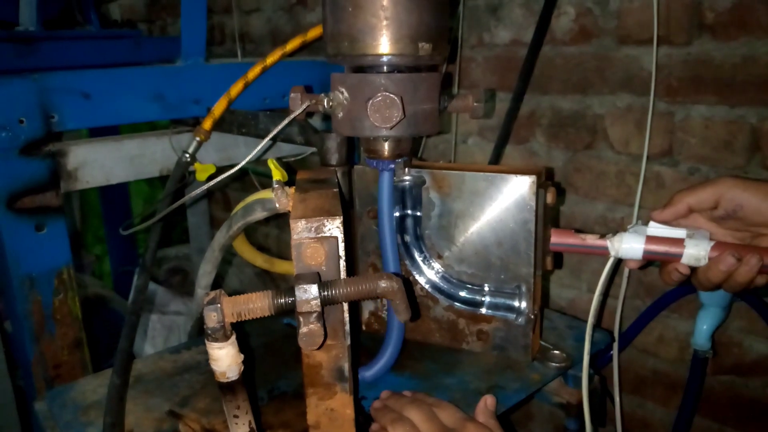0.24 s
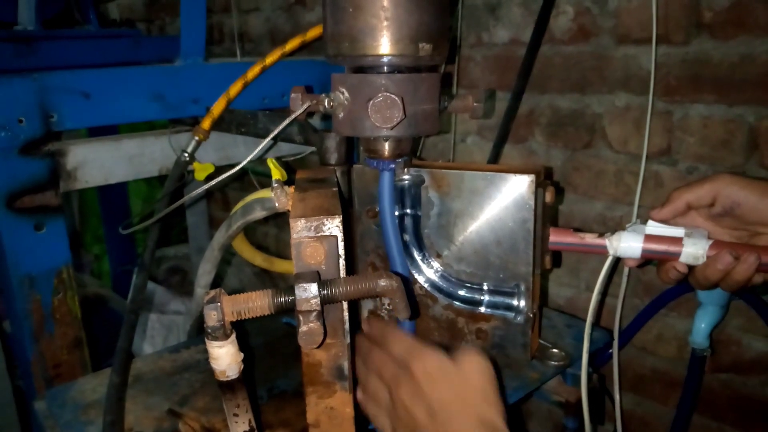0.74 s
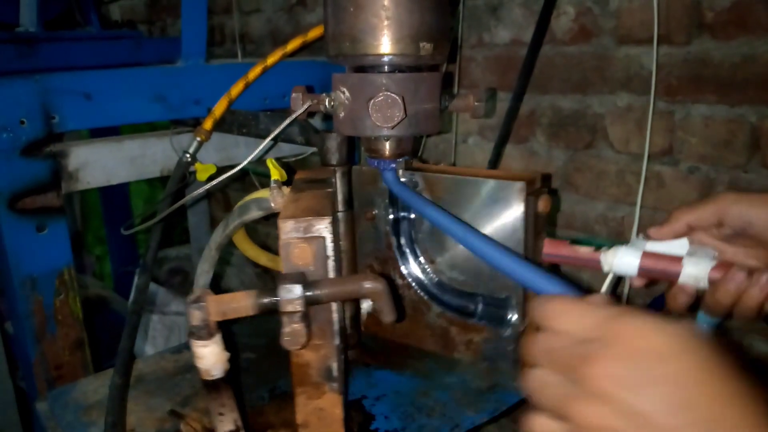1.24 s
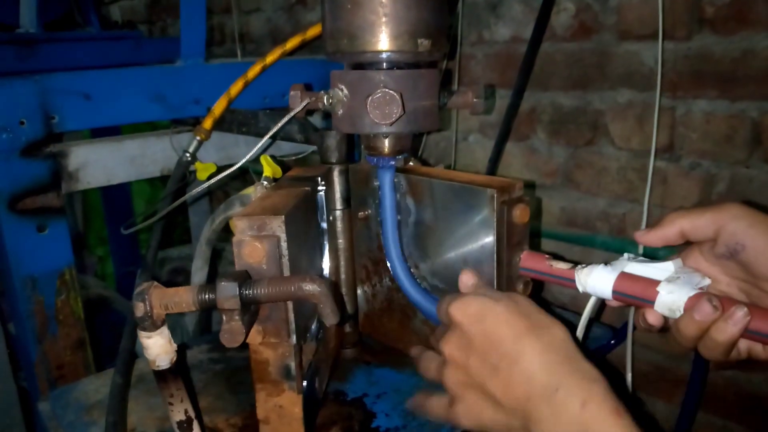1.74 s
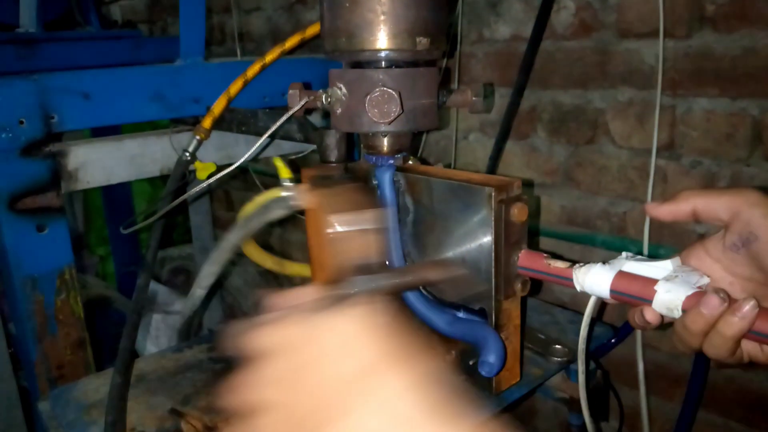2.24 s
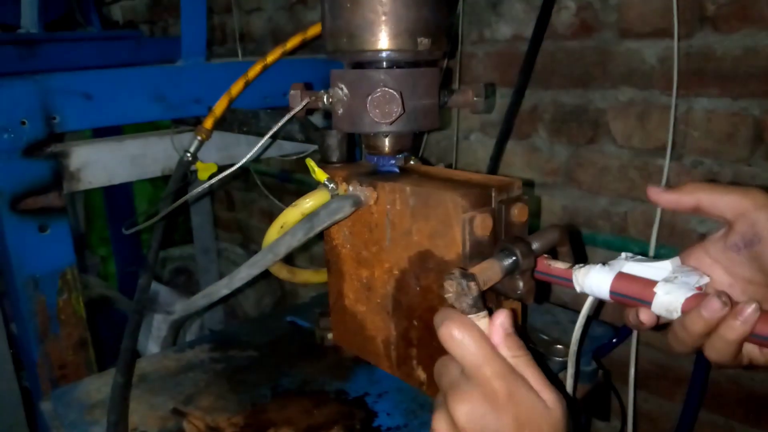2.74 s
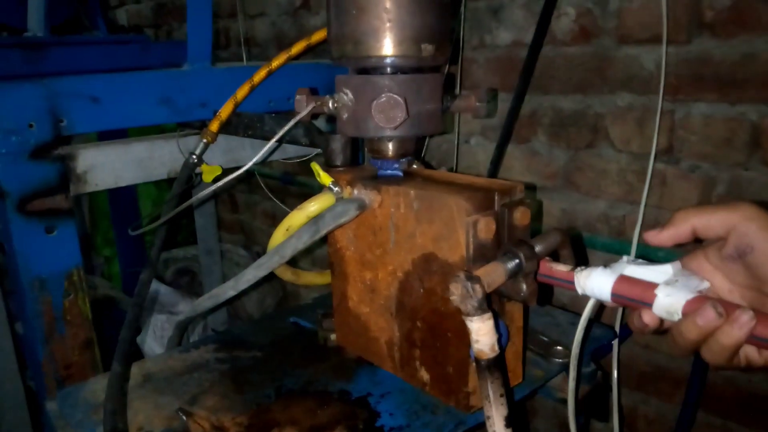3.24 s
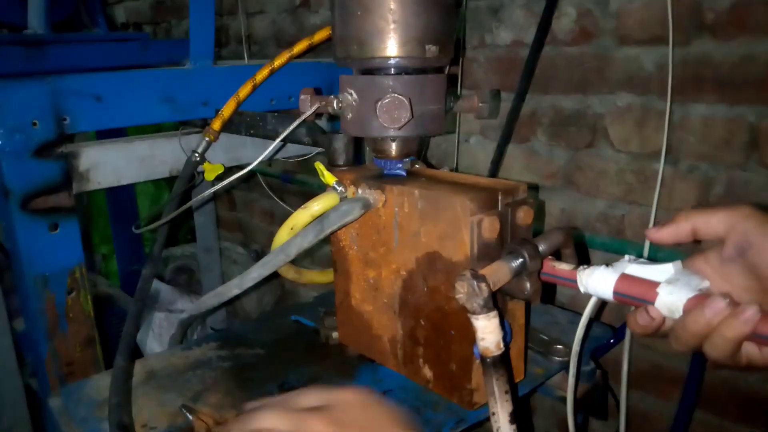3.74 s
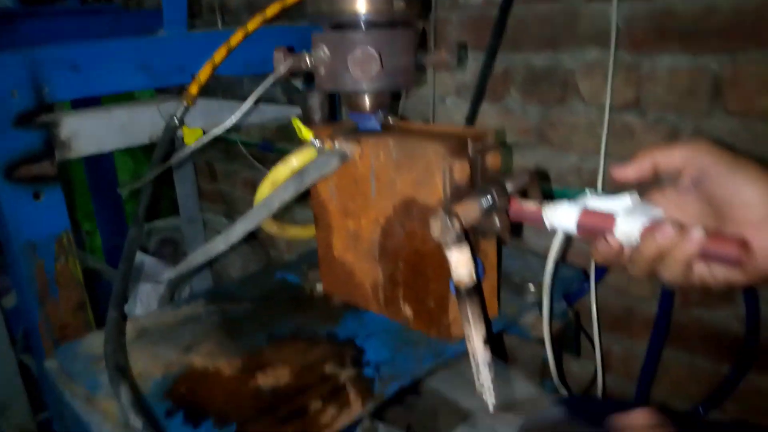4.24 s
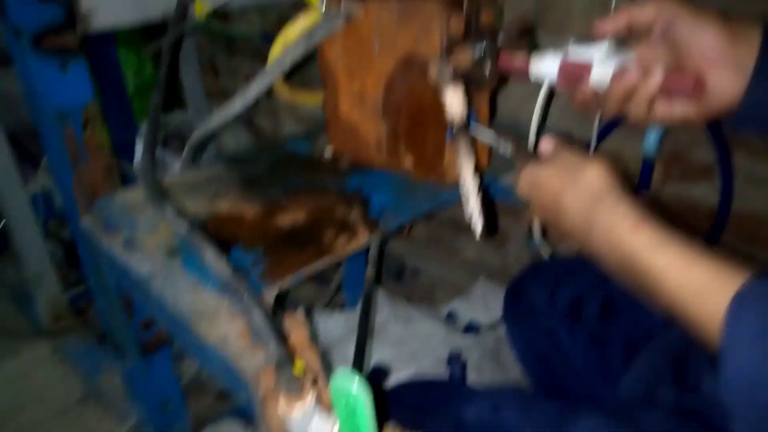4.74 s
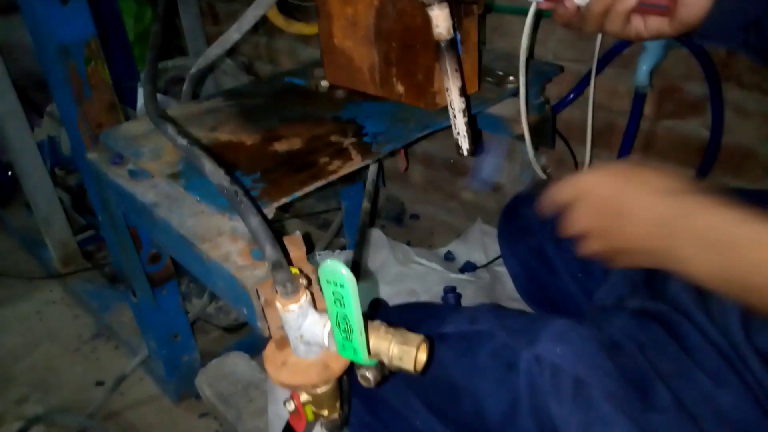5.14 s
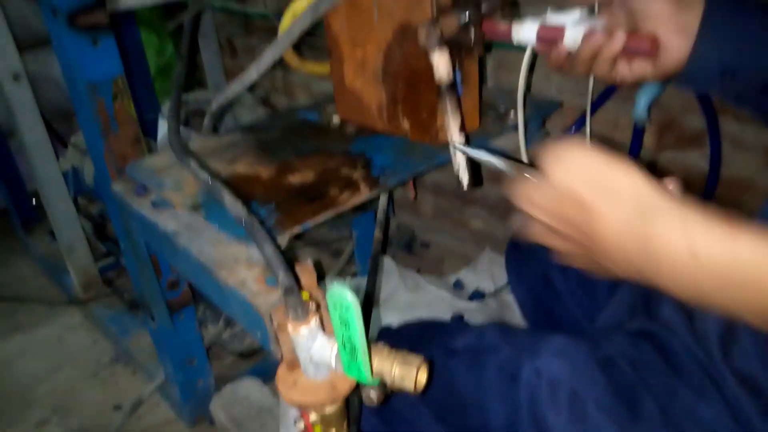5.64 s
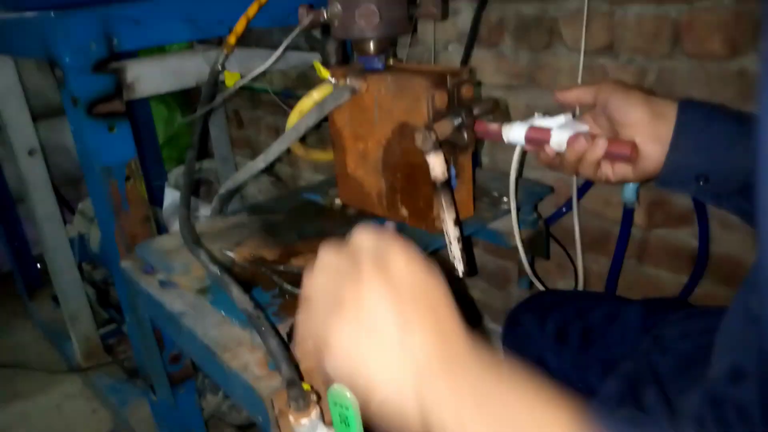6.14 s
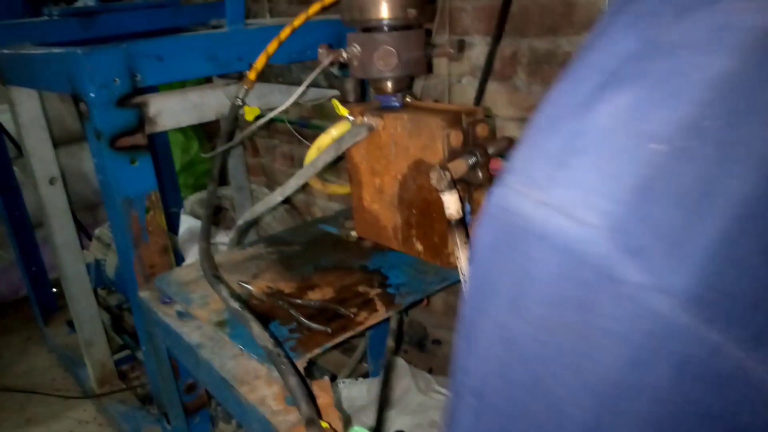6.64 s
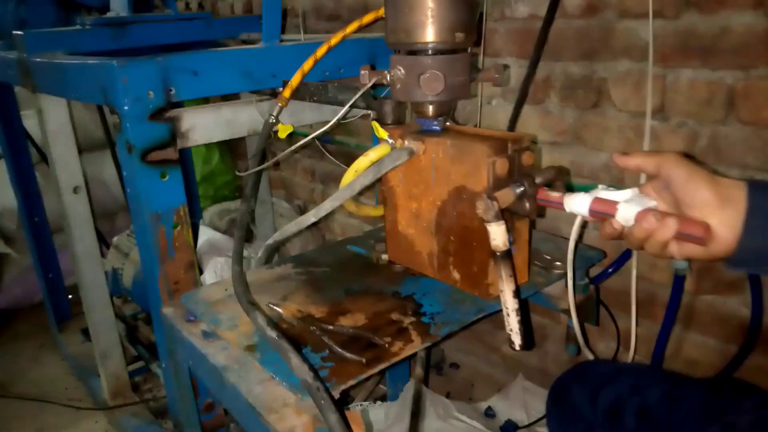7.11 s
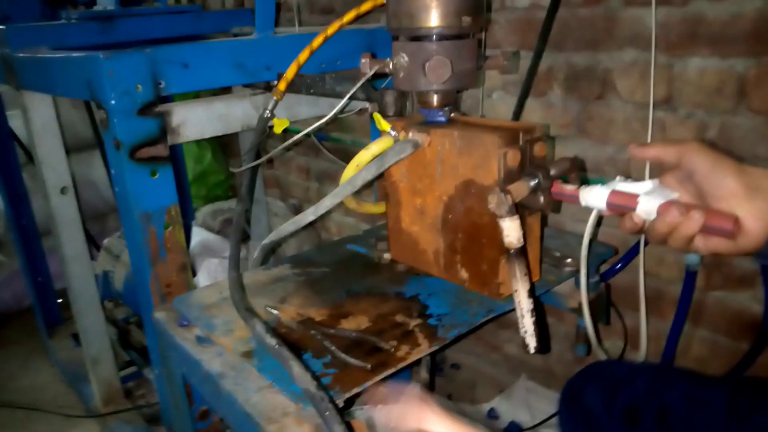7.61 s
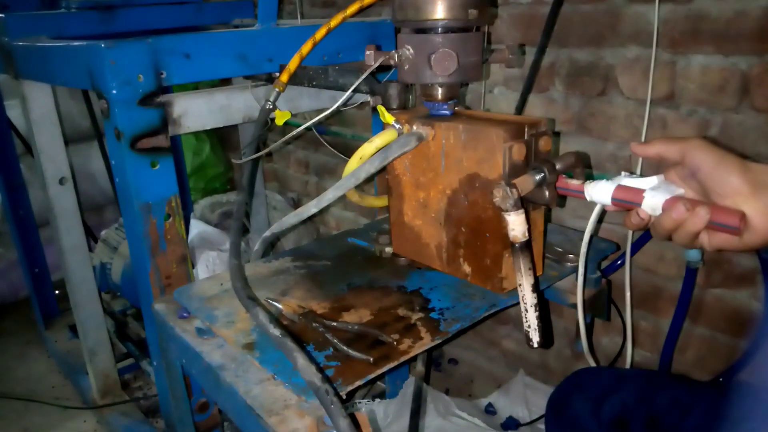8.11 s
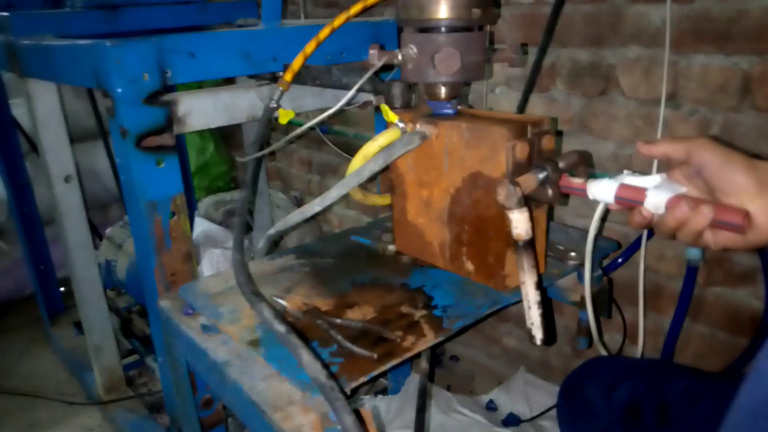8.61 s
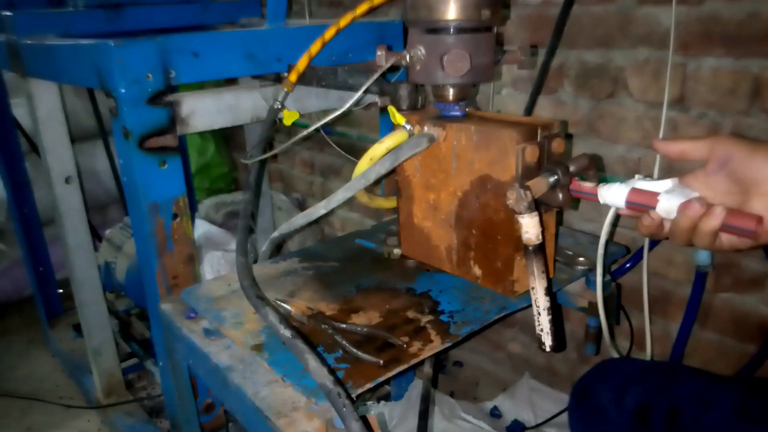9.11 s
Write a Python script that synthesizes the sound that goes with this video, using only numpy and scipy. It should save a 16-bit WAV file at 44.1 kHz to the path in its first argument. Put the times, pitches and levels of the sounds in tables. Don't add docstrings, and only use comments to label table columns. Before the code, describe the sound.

A small workshop heard through a nearby phone microphone. From 0 s a piston compressor throbs fast, about seventeen pulses a second, over low rumble, fan noise and thin whine. Around 1.1 s come dull knocks and a tick; at 2.4 to 2.5 s a click and light metal clink; near 3.1 s small rustles and bumps. At 3.2 s an air valve snaps open and a sharp, bright hiss rushes out, peaking about 3.5 s with a fuzzy high whistle while the machine drops back. A tiny chirp flicks by at 3.85 s. From 4 to 5.8 s the hiss eases and gains a lower roar. At 5.95 s a double steel clank rings and the hiss briefly flinches. It continues until 7.1 s, dips, then a buffeting puff with ticks and pops hits the microphone at 7.5 s. Weaker hiss follows, with a soft knock at 8.1 s, steady until fading slightly after 9.3 s.

```python
import sys
import numpy as np
from scipy import signal
from scipy.fft import rfft, irfft
from scipy.io import wavfile
from scipy.ndimage import uniform_filter1d

SR = 44100
rng = np.random.default_rng(int(sys.argv[2]) if len(sys.argv) > 2 else 0)


def wrap_up_sound(samples):
    columns = np.atleast_2d(samples).T
    tamed = np.clip(columns, -1, 1)
    steps = np.round(tamed * 32767).astype(np.int16)
    wavfile.write(sys.argv[1], SR, steps)


def volts(x):
    e = np.asarray(x, float) / 20
    return 10 ** e


N = 413216

TURNS_PER_S = 17.311
VALVE_S = 3.2025
# [time_s, hiss_db, leak]
NOZZLE = [(3.22, -21.5, 0.38), (3.35, -19.5, 0.28), (3.5, -17.5, 0), (3.85, -18.5, 0.1), (4.0, -20, 0.33),
          (4.6, -20.5, 0.68), (4.9, -22.5, 0.84), (5.8, -22.5, 0.86), (6.2, -22.5, 0.76), (7.03, -22, 0.54),
          (7.1, -29, 0.92), (7.45, -25, 0.9), (7.8, -29.5, 1), (8.1, -32, 0.84), (8.22, -26.5, 0.92),
          (9.26, -26.5, 0.91), (9.32, -33.5, 1.03), (9.37, -32.5, 1.01)]


def evened(x):
    return x / np.sqrt(np.mean(x ** 2) + 1e-20)


def read(points, hz):
    f, value = np.transpose(points)
    return np.interp(np.log(hz + 1), np.log(f + 1), value)


def follow(points, t):
    s, *columns = np.transpose(points)
    return [np.interp(t, s, c) for c in columns]


def ramp(t, start, length):
    return np.clip((t - start) / max(length, 1e-4), 0, 1)


def swell(t, start, rise, hold, fall):
    return ramp(t, start, rise) * np.exp(-np.maximum(t - start - rise - hold, 0) / max(fall, 1e-3))


def add(mix, s, sound):
    part = mix[round(s * SR):][:len(sound)]
    part += sound[:len(part)]


def sine(cycles):
    return np.sin(2 * np.pi * cycles)


def cosine(cycles):
    return np.cos(2 * np.pi * cycles)


def band(x, lo_hz, hi_hz):
    hz = np.fft.rfftfreq(len(x), 1 / SR)
    return evened(irfft(rfft(x) * (hz > lo_hz) * (hz < hi_hz), len(x)))


def grid(size):
    return np.arange(4 * N // size + 5) * size / 4 / SR, np.fft.rfftfreq(size, 1 / SR)


def noise(field_db, patchy_db, flicker_db):
    bins, frames = field_db.shape
    a, b, patches = rng.standard_normal((frames, bins, 3)).T
    patches = uniform_filter1d(patches, size=5, axis=0)
    patches = evened(uniform_filter1d(patches, size=20, axis=1))
    flicker = evened(uniform_filter1d(rng.standard_normal(frames), size=4))
    z = (a + 1j * b) * volts(field_db + patchy_db * patches + flicker_db * flicker)
    size = 2 * bins - 2
    return signal.istft(z, nperseg=size, noverlap=3 * size // 4)[1][:N]


def steady(spectrum, size, patchy_db, flicker_db):
    t, hz = grid(size)
    bin_db = read(spectrum, hz) + 10 * np.log10(SR / size)
    return noise(bin_db[:, None] + 0 * t, patchy_db, flicker_db)


def gain_control(t, quick=1):
    # [start_s, hold_s, recovery_s, change_db]
    dips = [
        (3.2, .1, .15, -5),
        (5.965, 0.034, 0.026, -6),
        (6.15, 0.76, 0.14, -2.5),
        (7.517, .03, .02, -9),
        (7.563, 0.085, 0.0096, -10),
        (7.692, .07, 0.073, 3),
    ]
    delay_s, knee_db, duck_db, slope = 0.051, -22.5, -5, 0.86
    over_db = np.maximum(follow(NOZZLE, t - delay_s)[0] - knee_db, 0)
    before_db = -0.35 * (np.minimum(t, VALVE_S) - 1.6)
    duck = ramp(t, 3.172, 0.025) * (duck_db - slope * over_db)
    quick_db = sum(db * swell(t, s, 0.029, hold, recovery) for s, hold, recovery, db in dips)
    return before_db + duck + quick * quick_db


def shaft_throb(t):
    # [order, level_db rms]
    listed_orders = [(11, -58.2), (12, -64.0), (13, -56.2), (14, -59.9), (15, -54.6), (16, -55.5),
                     (17, -61.8), (18, -57.2), (19, -54.9), (20, -47.5), (21, -53.6), (25, -63.8),
                     (32, -74), (34, -61.8), (37, -63.5), (38, -54.6), (39, -55.0), (40, -55.3),
                     (41, -57.0), (42, -73.0), (43, -69.0), (44, -62.5), (45, -64.9), (47, -64.6),
                     (48, -62.5), (55, -59.5), (59, -64.5), (61, -66), (64, -64.7), (75, -64.2),
                     (78, -66.0), (81, -64.2), (24, -76.0)]
    # [order, level_db rms]
    weak_orders = [(3, -75), (10, -66), (30, -71), (60, -70), (95, -80)]
    ring_at = [(12, .2, .01), (13, .03, .01), (14, .47, .01), (15, .55, .01), (16, .29, .01),
               (18, -.03, .01), (19, -.01, .01), (20, .445, .01), (21, .17, .01), (22, .23, .02),
               (25, .3, .5), (36, .2, .5), (37, .2, .01), (38, .36, .01), (39, .18, .01), (40, .44, .01),
               (41, .44, .01), (42, .22, .01), (43, .37, .01), (44, .5, .5)]
    loud_orders = [17, 18, 19, 20, 21, 37, 39, 41, 42, 43]
    # [time_s, order38_db, order40_db, order40_lag_cycles]
    travel = [(3.7, 0, 0, 0), (4.15, -1.5, -7, 0), (4.6, -.5, -3, -.15), (5.1, 1.5, 1, -.23),
              (5.6, 1.5, -1, -.31), (6.1, -2.5, -7, -.38), (6.6, -4.5, -8, -.49), (7.1, -3.5, -12, -.54),
              (8.1, -1.5, -21, -.8), (9.4, -2, -20, -1)]
    moved_db = np.array([2.5, -4.5, 5, -.5, -5.5, -2, 5, -6, 12, 6])
    k = np.arange(1, 96)
    chance = rng.standard_normal((len(k), 2))
    level_db = np.interp(k, *np.transpose(weak_orders)) + 3.2 * chance[:, 0]
    for order, db in listed_orders:
        level_db[int(order) - 1] = db
    order, share, scatter = np.transpose(ring_at)
    lag = np.cumsum(np.interp(k, order, share)) + np.interp(k, order, scatter) * chance[:, 1]

    angle = np.arange(2048) / 2048
    waves = np.sqrt(2) * volts(level_db)[:, None] * cosine(np.outer(k, angle) - lag[:, None])
    loud = np.isin(k, loud_orders)
    rest = ~loud & ~np.isin(k, (38, 40))
    cycles = waves[loud].sum(0), volts(moved_db) @ waves[loud], waves[rest].sum(0)
    here, there, chatter = (np.interp(t * TURNS_PER_S % 1, angle, c, period=1) for c in cycles)
    throb = here + ramp(t, 3.9, 0.6) * (there - here)
    lower_db, upper_db, late = follow(travel, t)
    for m, db, more in ((38, lower_db, 0), (40, upper_db, late)):
        phase = m * TURNS_PER_S * t - lag[m - 1] - more
        throb = throb + np.sqrt(2) * volts(level_db[m - 1] + db) * cosine(phase)
    return throb, chatter


def gear_whine(t):
    # [order, level_db rms]
    mesh_tones = [(24.5, -63.5), (114.5, -63.5), (118.5, -63), (122.5, -63), (126.5, -69)]
    return sum(np.sqrt(2) * volts(db) * cosine(m * TURNS_PER_S * t) for m, db in mesh_tones)


def valve_puffs(t):
    # [centre_hz, width_hz, level_db rms, share_of_turn, sharpness]
    passages = [(2050, 150, -56, .06, .7), (4520, 300, -58.5, .44, .9), (2830, 90, -62, .7, .3)]
    hiss = rng.standard_normal(N)
    out = np.zeros(N)
    for hz, width, db, share, sharp in passages:
        pulse = evened(np.exp(sharp * np.cos(2 * np.pi * (t * TURNS_PER_S - share))))
        out += volts(db) * band(hiss, hz - width / 2, hz + width / 2) * pulse
    return out


def compressor():
    # [pitch_hz, density_db per Hz]
    rumble_colour = [(25.0, -98.6), (45.0, -78), (80.0, -73.5), (130.0, -72), (200.0, -75), (340.0, -76),
                     (430.0, -78.5), (500.0, -76), (680.0, -77.0), (850.0, -77.5), (1000.0, -78),
                     (1350.0, -78.5), (1700.0, -82.5)]
    # [pitch_hz, density_db per Hz]
    fan_colour = [(1400.0, -110.0), (1750.0, -82), (2050.0, -81.5), (2450.0, -85), (2800.0, -82),
                  (3400.0, -83.5), (4500.0, -80), (5100.0, -84.5), (6500.0, -80.5), (7200.0, -87),
                  (8000.0, -100.0), (13600.0, -110.0), (14600.0, -97.6), (15700.0, -100.0)]
    # [start_s, length_s, change_db]
    nearer = [
        (3.25, .1, -1),
        (4.05, 0.46, 1.5),
        (6.1, 0.2, 3.5),
        (8.15, 0.33, -1),
    ]
    t = np.arange(N) / SR
    throb, chatter = shaft_throb(t)
    gain_db = gain_control(t)
    loud_db = gain_db + sum(db * ramp(t, s, length) for s, length, db in nearer)
    fan = volts(1.44) * steady(fan_colour, size=512, patchy_db=1.0, flicker_db=0.3)
    rumble = volts(2.0) * steady(rumble_colour + [(2100, -110)], size=2048, patchy_db=0.96, flicker_db=0.5)
    background = chatter + volts(-0.5) * gear_whine(t) + fan + rumble + valve_puffs(t)
    return volts(loud_db + 0.44) * throb + volts(gain_db) * background


def knocks():
    # [start_s, peak_db, pitch_hz, t60_s]
    blows = [(1.0612, -24, 720, 0.018), (1.064, -37, 290, 0.034), (0.99, -35, 240, .05),
             (1.1049, -22.5, 2100, 0.009), (1.078, -27, 400, .035), (1.102, -30, 300, .03),
             (1.12, -31, 500, .03), (1.106, -39, 336, 0.042), (3.164, -36, 285, .04),
             (3.346, -36, 200, .02), (2.4102, -28, 2100, .014), (2.4102, -29, 1300, 0.014),
             (2.4115, -35, 5100, .02), (3.185, -34, 1400, .02), (3.164, -31, 2150, .025),
             (3.15, -35, 2100, .03), (3, -33, 1720, .02), (3.412, -32, 290, .03), (5.107, -32, 213, 0.1),
             (5.149, -38, 250, .06), (5.19, -37, 194, 0.058), (5.992, -34, 137, 0.036),
             (2.4955, -24, 6580, 0.023), (2.494, -22.5, 5330, 0.016), (2.4945, -25.5, 4800, .03),
             (5.9918, -8, 6400, .012), (5.9915, -10, 6600, .014), (5.9415, -35, 1400, .03),
             (5.9415, -26, 2720, .04), (5.953, -17.5, 5351, .2), (5.991, -27, 3300, .06),
             (5.9915, -13, 4400, .015), (7.5425, -12, 5800, .04), (7.555, -13, 6100, .03),
             (7.585, -12, 6000, .02), (8.1, -31, 380, 0.032)]
    out, t = np.zeros(N), np.arange(8192) / SR
    for s, db, hz, t60 in blows:
        bend = 1 + min(0.12, 60 / hz) * np.exp(-t / 0.0041)
        add(out, s, ramp(t, 0, 0.00067) * volts(db - 60 * t / t60) * sine(hz * t * bend))
    return out


def ticks():
    # [start_s, level_db rms, rise_s, t60_s, tilt_db per octave]
    rustles = [(1.054, -30.5, .008, .06, 1), (1.064, -35, .003, 0.17, -5), (1.1045, -29, 0.0011, .012, 1),
               (1.108, -38, .002, .1, 2), (1.28, -50, .005, .05, 5), (2.410, -37, .0005, .025, -7),
               (2.494, -38, .002, .03, 0), (3.055, -36.5, .013, .05, 2), (3.120, -34.5, 0.028, 0.16, 2),
               (3.158, -29, 0.008, .05, 0), (3.2027, -23, .001, .03, 5.5),
               (3.225, -30.5, 0.0044, 0.23, -1.5), (3.305, -18, 0.00077, .008, 6),
               (5.942, -23.5, .004, .09, -1), (5.9885, -16, 0.002, .03, 1), (5.9912, -13, .001, .016, 2),
               (5.995, -28, 0.0022, 0.29, -.5), (6.665, -34, .006, 0.042, 8), (7.52, -25, 0.029, 0.46, 1.5),
               (7.542, -27, 0.0089, .25, 0), (7.62, -38, .03, .2, -1)]
    # [pitch_hz, level_db]
    tick_colour = [(300, -21), (900, -14), (3000, -4), (6500, 4), (8500, -17), (13500, -19), (14800, -5)]
    out, t = np.zeros(N), np.arange(8192) / SR
    hz = np.fft.rfftfreq(len(t), 1 / SR)
    for s, db, rise, t60, tilt_db in rustles:
        burst = rng.standard_normal(len(t))
        colour = volts(read(tick_colour, hz) + tilt_db * np.log2(hz / 5000 + 0.029))
        shape = np.minimum(t / max(rise, 1e-4), 1) * volts(-60 * np.maximum(t - rise, 0) / t60)
        add(out, s, volts(db) * evened(irfft(rfft(burst) * colour)) * shape)
    return out


def ring(t, hz, t60):
    wobble = evened(uniform_filter1d(rng.standard_normal(len(t)), size=150))
    shape = ramp(t, 0, 0.0015) * volts(-60 * t / t60) * (1 + 0.15 * wobble)
    return shape * sine(hz * t + rng.random())


def clanks():
    # [start_s, peak_db, pitch_factor, damping_factor]
    strikes = [
        (2.494, -29, 1, .1),
        (5.944, -21, 0.92, .4),
        (5.990, -14.5, 1.001, 0.93),
    ]
    # [pitch_hz, level_db, t60_s]
    steel_modes = [(1470, -45, .2), (1771, -25, 0.3), (2730, -20, 0.15), (4250, -6.5, 0.14),
                   (4930, -3, 0.37), (4990, -9, .5), (5530, -8, .08), (6370, -2, 0.05), (8400, -27, 0.18),
                   (9900, -26, 0.3), (12500, -26, 0.27)]
    out, t = np.zeros(N), np.arange(8192) / SR
    for s, db, pitch, damping in strikes:
        add(out, s, sum(volts(db + d) * ring(t, f * pitch, t60 * damping) for f, d, t60 in steel_modes))
    return out


def jet_levels(t):
    # [start_s, rise_s, fall_s, change_db]
    gusts = [
        (3.222, 0.02, 0.032, 9.5),
        (7.515, 0.042, 0.096, 10.5),
    ]
    gust_share = (0.97, 0.88, 0.56, 0.05)
    first_rush_share = (0.59, .02, 0.99, .8)
    # [start_s, hold_s, recovery_s, change_db]
    flinches = [
        (5.975, 0.042, 0.045, -8),
        (7.649, 0.036, 0.053, -9.5),
        (7.762, .2, 0.054, 2),
    ]
    flinch_share = (.2, .35, .7, .9)
    body_db, leak = follow(NOZZLE, t)
    low_db = body_db - 18 + 13 * leak
    empty = np.exp(-np.maximum(t - VALVE_S, 0) / 1.5)
    swing_db = body_db + 23.5
    fizz_db = -40.5 + 6 * empty + 0.46 * swing_db
    top_db = -26 - 5 * empty - 0.1 * swing_db
    levels = np.array([low_db, body_db, fizz_db, top_db])
    for k, (s, rise, fall, db) in enumerate(gusts):
        levels += np.outer(gust_share if k else first_rush_share, db * swell(t, s, rise, 0, fall))
    for s, hold, recovery, db in flinches:
        levels += np.outer(flinch_share, db * swell(t, s, 0.0066, hold, recovery))
    return levels


def jet_colour(t, hz):
    # [pitch_hz, density_db per Hz]
    fresh_jet = [(700.0, -32.9), (1500.0, -33), (2300.0, -28.5), (2950.0, -26), (3750.0, -18.5),
                 (4200.0, -14), (5000.0, -8), (6050.0, -1), (7000.0, -6.5), (7500.0, -11), (8000.0, -19.5),
                 (13700.0, -20), (14500.0, -10.7), (15700.0, -8)]
    # [pitch_hz, density_db per Hz]
    filling_jet = [(700.0, -17.8), (1500.0, -28.5), (2300.0, -22.5), (2950.0, -21.5), (3750.0, -14),
                   (4200.0, -10), (5000.0, -5.5), (6050.0, -0.5), (7000.0, -3.5), (7500.0, -11),
                   (8300.0, -20), (13700.0, -17), (14500.0, -10), (15700.0, -6)]
    # [pitch_hz, density_db per Hz]
    settled_jet = [(700.0, -14.8), (1500.0, -27.5), (2300.0, -21), (2950.0, -20.5), (3750.0, -15.5),
                   (4200.0, -7.5), (5000.0, -0.9), (6050.0, -1.5), (7000.0, -8.5), (7500.0, -17.5),
                   (8300.0, -22.5), (13800.0, -18), (14500.0, -2), (15700.0, 1)]
    # [time_s, stage]
    settling = [
        (3.9, 0.083),
        (4.8, 0.99),
        (5.8, 1.1),
        (6.3, 1.8),
    ]
    stage = np.clip(follow(settling, t)[0], 0, 2)
    field_db = -14 * np.log2(np.maximum(800 / (hz[:, None] + 1), 1))
    for k, colour in enumerate((fresh_jet, filling_jet, settled_jet)):
        field_db = field_db + np.outer(read(colour[1:], hz), np.maximum(1 - abs(stage - k), 0))
    return field_db


def whistles(t, hz):
    # [middle_s, half_length_s, pitch_hz, level_db above the hiss]
    singing_modes = [(3.32, .07, 6630, 10), (3.54, 0.26, 6560, 12.5), (4.16, 0.48, 6590, 7.5),
                     (5.1, 0.35, 5830, 3), (5.44, .45, 6320, 2.5), (6.62, 0.57, 6560, 5.5),
                     (7.5, 0.68, 6600, 5), (8.85, 0.71, 6600, 6), (3.2, .3, 5560, -3),
                     (4.02, 0.37, 5510, 6.5), (6.2, 0.3, 5280, 2), (6.36, 0.26, 5330, 5.5),
                     (6.76, 0.2, 5360, 7.5), (7.02, 0.067, 5420, 6), (8.7, 0.46, 5520, 4),
                     (4.55, 0.43, 4700, 3), (5.7, 0.28, 4700, 8), (5.2, .3, 4400, 2), (6.7, .4, 4400, -1),
                     (8.7, 0.54, 4420, 1.5), (4.65, .22, 3300, 5), (5.05, .3, 3250, 5), (5.55, .3, 3270, 5),
                     (6.5, 0.5, 3350, 4), (7.95, 0.2, 3420, 4.5), (4.2, 0.8, 10250, 3), (4.4, 0.41, 8900, 2),
                     (4.7, .7, 9600, 3), (4.3, 0.41, 5200, 6), (5.8, 0.16, 5200, 1), (5.966, .018, 5300, 8),
                     (6.17, .06, 5860, 4), (3.32, .07, 4020, 4.5), (3.27, .09, 4550, 2),
                     (3.5, 0.19, 3770, 3), (8.4, 0.64, 4960, 0), (7, 0.27, 3700, -2), (7.35, .15, 5400, 3),
                     (7.58, .05, 5790, 5), (6.66, .3, 4750, 1), (5.1, .4, 7200, 1), (5.6, .25, 7400, 2.5),
                     (5.0, .3, 4580, 2), (5.55, .25, 5250, 2), (5.97, .2, 5850, 2.5), (8.05, .2, 2880, 2.5),
                     (7.57, .05, 4800, 3.5), (8.04, .25, 5250, 1), (9, .3, 5500, 3.5), (3.95, .25, 3200, 0),
                     (8.1, .9, 14600, 3), (8, 1, 14150, 3), (6.5, .6, 13000, 2), (5.2, .3, 10600, 2),
                   (5.4, .4, 12300, 3), (3.25, .03, 10000, 6), (4.6, .5, 8800, 2), (7.9, 1, 9600, 2),
                   (8.2, .8, 13100, 0)]
    wander_hz, width_hz, flutter_db = 22, 127, 0.9
    singing = singing_modes
    drift = evened(uniform_filter1d(rng.standard_normal((len(singing), 2, len(t))), size=24))
    lift = 1
    for (s, half, centre_hz, db), (wander, flutter) in zip(singing, drift):
        off = (hz[:, None] - centre_hz - wander_hz * wander) / width_hz
        strength = volts(2 * (db + flutter_db * flutter) + 2.5) * np.exp(-((t - s) / half) ** 2)
        lift = lift + strength / (1 + off ** 2) ** 2
    return 10 * np.log10(lift)


def hollows(t, hz):
    # [middle_s, half_length_s, pitch_hz, change_db]
    gaps = [(8.4, .9, 4800, -5), (8.4, 1.0, 2550, -7), (6.7, .5, 2530, -4), (5.0, 1.0, 2570, -2),
            (7.3, .25, 2440, -4), (8.9, .3, 3150, -1), (8.6, .8, 1400, -2), (5.0, 0.99, 5000, -3),
            (4.3, 1, 3500, -3.5), (4.7, .5, 6080, -3), (8.6, .7, 6850, 0), (7.7, 1, 8000, -4),
            (7.1, .25, 5950, -3), (6.0, .2, 3560, -3), (7.5, .2, 3200, -5), (3.6, .25, 4400, -2),
            (3.55, .3, 5750, -3), (5.5, .6, 11200, -6), (8.6, .8, 13900, -3), (7.3, .3, 3600, -5),
            (7.6, .06, 3400, -5), (8.05, .2, 3120, -5), (6.1, .15, 5800, -2)]
    width_hz = 116
    out = np.zeros((len(hz), len(t)))
    for s, half, centre_hz, db in gaps:
        across = np.exp(-((hz - centre_hz) / width_hz) ** 2)
        out += db * np.outer(across, np.exp(-((t - s) / half) ** 2))
    return out


def echo_comb(t, hz):
    # [delay_ms, drift_ms per s, depth_db]
    surfaces = [(1.1, -.004, .7), (1.9, -.012, .8), (2.5, .006, .9), (3.3, -.02, .7), (5.1, .015, .6)]
    treble = ramp(hz[:, None], 7000, 1000)
    return sum(db * treble * cosine(np.outer(hz, ms + drift_ms * t) / 1000) for ms, drift_ms, db in surfaces)


def jet():
    # [from_hz, to_hz]
    jet_bands = [(1500, 2800), (3200, 4800), (5000, 7500), (8000, 13500), (14200, 15700)]
    t, hz = grid(size=1024)
    low_db, body_db, fizz_db, top_db = jet_levels(t)
    field_db = jet_colour(t, hz) + hollows(t, hz) + echo_comb(t, hz) + whistles(t, hz)
    roar_db = -43 + 0.46 + gain_control(t, quick=0.46)
    energy = volts(2 * field_db)
    for k, (db, (lo, hi)) in enumerate(zip((roar_db, low_db, body_db, fizz_db, top_db), jet_bands)):
        share = np.interp(hz, np.ravel(jet_bands), np.arange(10) // 2 == k)
        band_db = 10 * np.log10(energy[(hz > lo) & (hz < hi)].sum(0))
        field_db += np.outer(share, db - body_db - band_db)
    t = np.arange(N) / SR
    cracked_s, cracked_db = 0.019, -6
    fully_open = ramp(t, VALVE_S + cracked_s - 0.004, 0.006)
    valve = ramp(t, VALVE_S, 0.0015) * volts(cracked_db * (1 - fully_open))
    return valve * volts(jet_levels(t)[1] + 1.48) * noise(field_db, patchy_db=1.0, flicker_db=0.55)


def pop(direction, db, rebound, rebound_hz):
    t = np.arange(-100, 2000) / SR
    cycles = np.maximum(t, 0) * rebound_hz
    back = 1.6 * rebound * sine(cycles) * np.exp(-cycles / 0.45)
    spike = np.exp(-(t / 0.0002) ** 2 / 2)
    return direction * volts(db) * (spike - back * ramp(t, 0, 0.0018))


def air_pops():
    # [time_s, direction, peak_db, rebound_share, rebound_hz]
    pulses = [
        (3.3059, 1, -25.5, .2, 150),
        (7.5442, -1, -31, .7, 170),
        (7.5474, -1, -27.5, .15, 200),
        (7.5524, 1, -22.5, .3, 75),
        (7.5683, -1, -27, .6, 105),
        (7.5788, -1, -20.5, .38, 90),
    ]
    out = np.zeros(N)
    for s, *push in pulses:
        add(out, s - 100 / SR, pop(*push))
    return out


def squeak():
    out = np.zeros(N)
    glide_hz = np.geomspace(14500, 11000, round(0.009 * SR))
    add(out, 3.848, volts(-22) * np.hanning(len(glide_hz)) * sine(np.cumsum(glide_hz) / SR))
    return out


def splits():
    # [middle_s, from_hz, to_hz, level_db rms]
    moments = [(4.538, 9000, 10500, -44), (4.538, 11700, 13300, -44), (4.6095, 6200, 7800, -27),
               (5.258, 4100, 7100, -25), (5.258, 8300, 11800, -45), (5.258, 13000, 15700, -33),
               (6.419, 4100, 5400, -30), (6.419, 9000, 10500, -43), (6.419, 11700, 13300, -43),
               (7.21, 4100, 5400, -36), (7.21, 6900, 9800, -45), (8.369, 4100, 5400, -35),
               (8.533, 6900, 9000, -42)]
    out = np.zeros(N)
    for s, lo_hz, hi_hz, db in moments:
        hiss = band(rng.standard_normal(2048), lo_hz, hi_hz)
        add(out, s - 1024 / SR, volts(db) * np.hanning(2048) ** 0.5 * hiss)
    return out


def scene():
    handling = knocks() + ticks() + clanks() + squeak()
    return compressor() + handling + jet() + air_pops() + np.outer([1, -1], splits())


def top_cut(x):
    return signal.sosfilt(signal.butter(12, 17100, fs=SR, output="sos"), x)


def record(dry):
    low_pass = signal.firwin(511, 15760, window=("kaiser", 9), fs=SR)
    limited = signal.oaconvolve(dry, low_pass[None], "same")
    bass_cut = signal.butter(2, 46, "high", fs=SR, output="sos")
    limited = signal.sosfilt(bass_cut, limited)
    return top_cut(limited)


dry = scene()
out = record(dry)
wrap_up_sound(out)
```